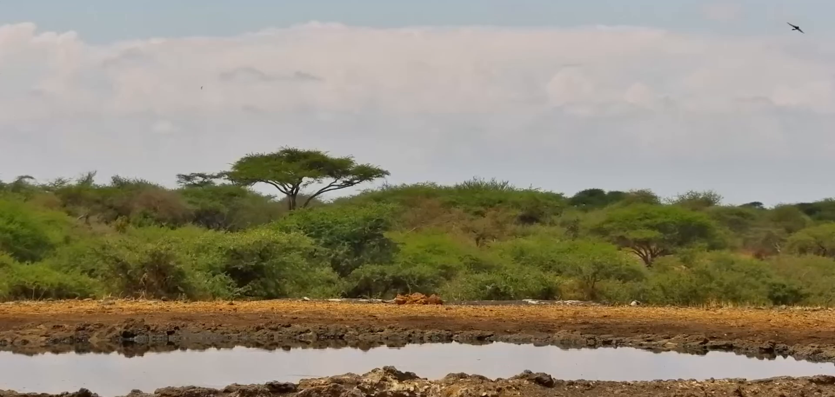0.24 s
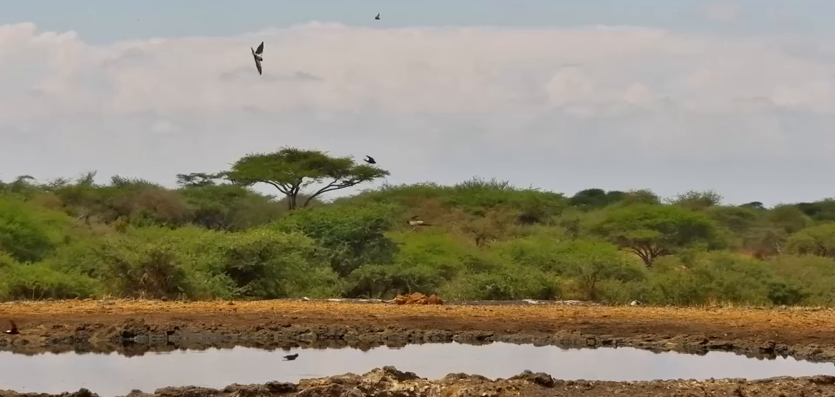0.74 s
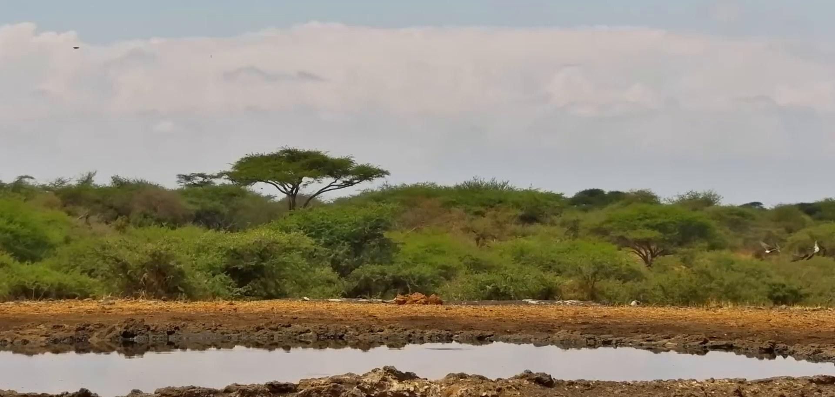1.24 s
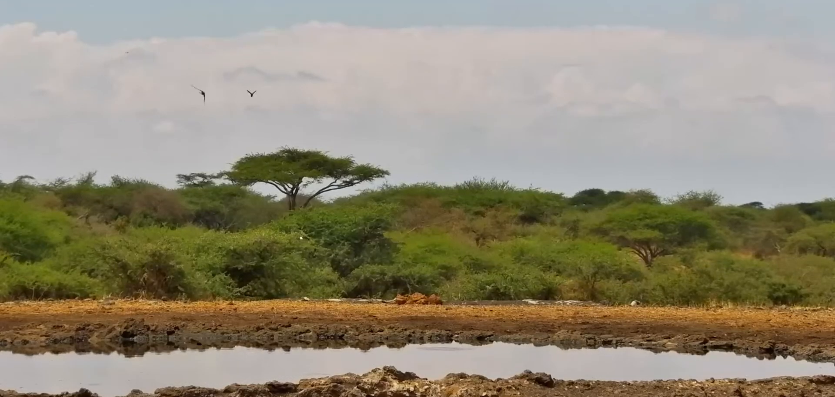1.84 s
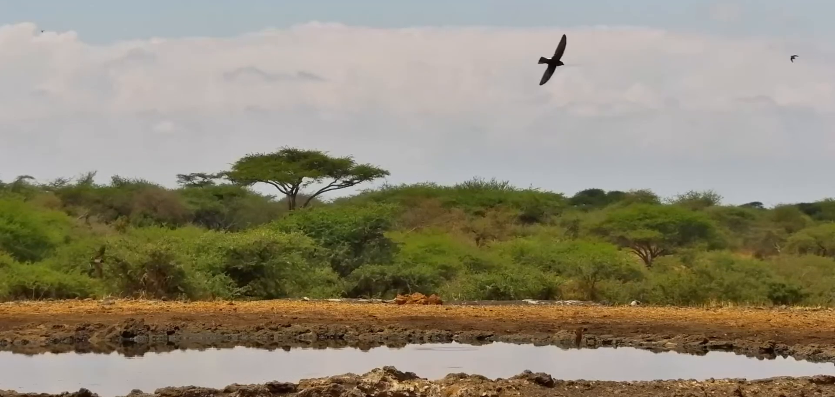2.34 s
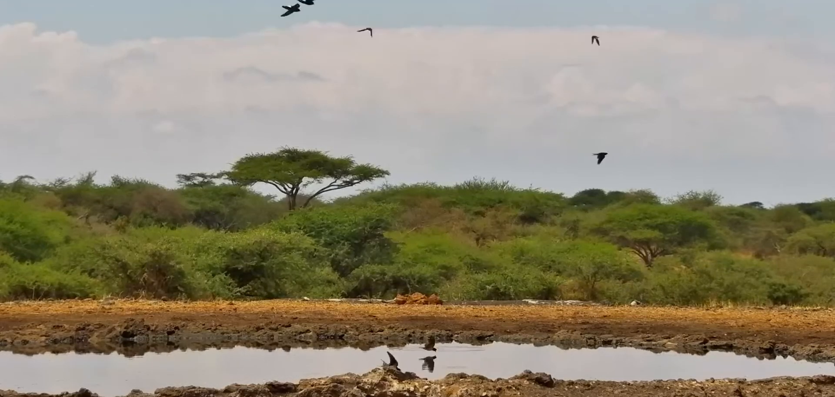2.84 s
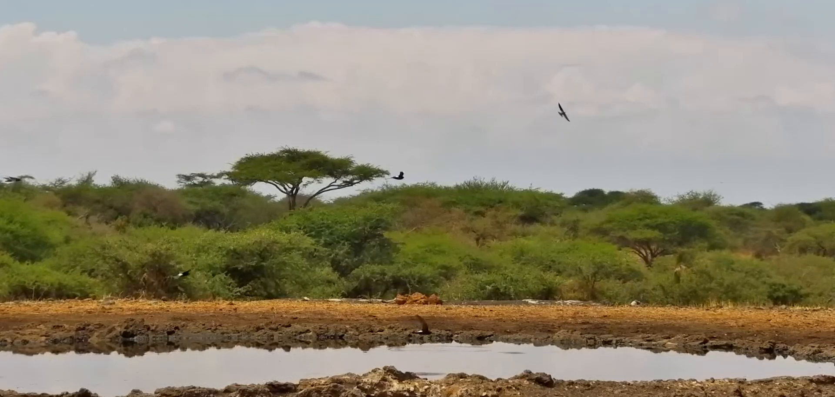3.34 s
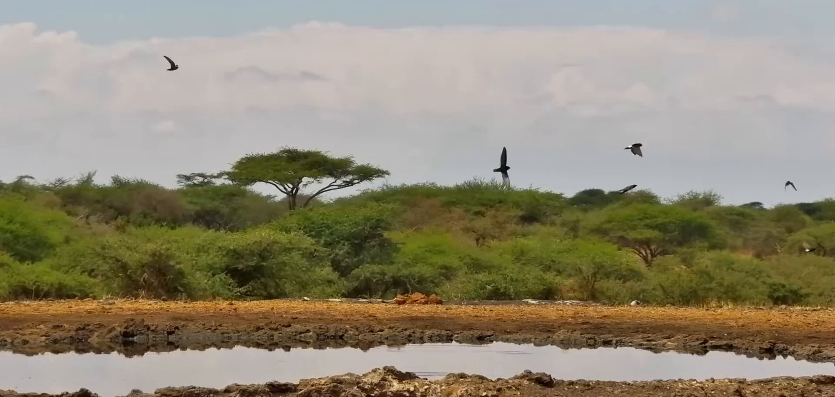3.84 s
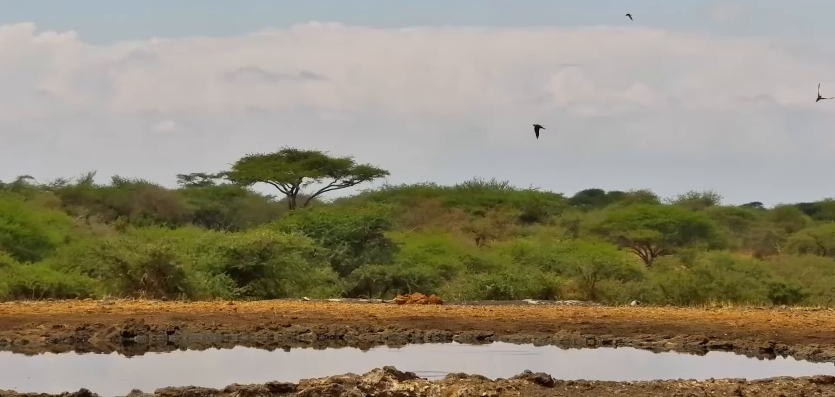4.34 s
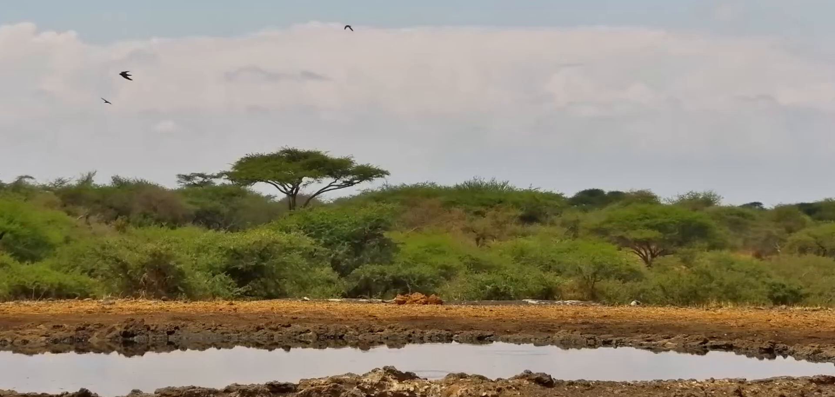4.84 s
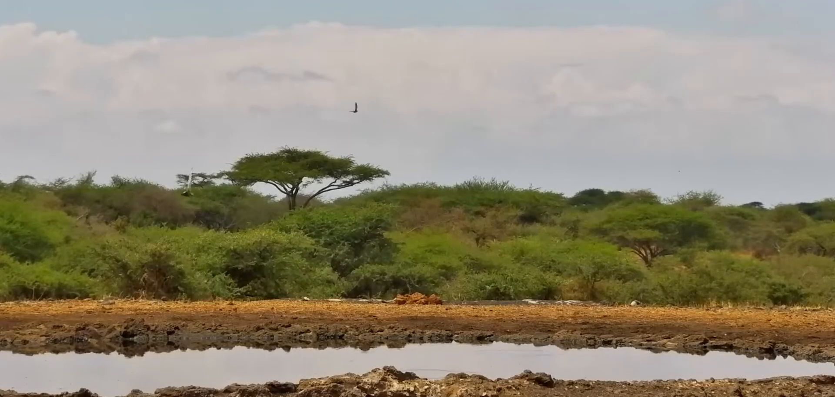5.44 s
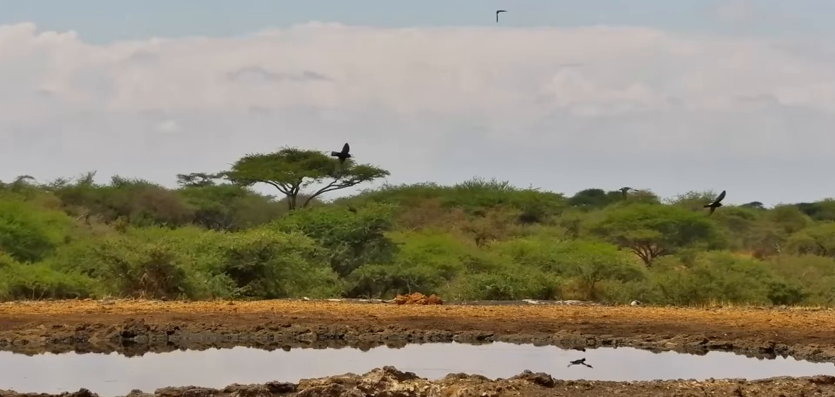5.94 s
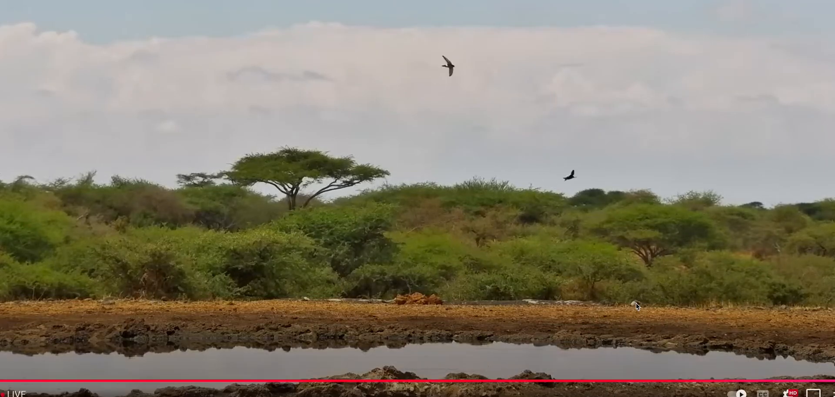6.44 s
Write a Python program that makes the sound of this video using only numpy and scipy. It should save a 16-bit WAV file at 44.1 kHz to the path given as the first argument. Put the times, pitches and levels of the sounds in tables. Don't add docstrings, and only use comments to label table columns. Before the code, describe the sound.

Shrill descending swift trills swell close and fade away outdoors, mixed with brief wing flutters and dull far-off thuds, then only quiet airy hiss.

```python
import sys
import numpy as np
from scipy import signal
from scipy.fft import rfft, irfft
from scipy.io import wavfile
from scipy.ndimage import uniform_filter1d

SR = 44100
rng = np.random.default_rng(int(sys.argv[2]) if len(sys.argv) > 2 else 0)


def wav_record(signal):
    frames = np.transpose(np.atleast_2d(signal))
    bounded = np.clip(frames, -1, 1)
    quanta = np.round(bounded * 32767).astype(np.int16)
    wavfile.write(sys.argv[1], SR, quanta)


def voltage_ratio(level):
    return 10 ** (np.asarray(level, float) / 20)


N = 294984
TIME = np.arange(N) / SR
BINS = np.maximum(np.fft.rfftfreq(N, 1 / SR), 1)

# start_s [s], level_db [dB], pitch_hz [Hz], bend over the
# held part [%], held_ms [ms]
BIRD_1 = [(.606, -47.5, 4620, 3.5, 20), (.633, -41.5, 5220, -1.5, 7.4), (.678, -32, 5030, -4, 16.1),
          (.726, -29.5, 5150, -4.5, 14), (.769, -30.5, 4760, 1, 18), (.797, -43, 4660, -0.5, 7.9),
          (.809, -43, 4830, 3.5, 11), (.857, -40, 4550, -9, 20), (.892, -46, 4550, -9.5, 19),
          (.94, -41, 4700, -1.5, 13.7), (.974, -36, 4080, -3, 6.7), (1.012, -38.5, 4160, 0, 13),
          (1.043, -42, 4370, -3, 12), (1.075, -44, 4060, 4, 14.4), (1.105, -44, 3970, -3.5, 17),
          (1.137, -44.5, 3846, -4.5, 7.4), (1.163, -55, 3780, -11, 5.6), (1.188, -52, 3560, 8, 7.8),
          (1.212, -60, 3540, 10, 6.8)]
BIRD_2 = [(.815, -38, 3680, 0.64, 11), (.855, -36, 3650, 1.4, 7), (.897, -37, 3496, 0, 11.3),
          (.927, -41.5, 3515, 1, 11), (.972, -52, 3430, 2, 5.6), (1.0, -47, 3450, 1.7, 13)]
BIRD_3 = [(1.399, -35, 4240, -1.5, 20.4), (1.454, -22, 4650, -12.5, 12), (1.5, -25.5, 4596, -8, 19.7),
          (1.545, -28.5, 4365, -12.5, 19.6), (1.589, -29.5, 4045, -0.5, 16), (1.632, -25.5, 4010, 1, 14.7),
          (1.672, -23.5, 3980, -1.5, 9.8), (1.711, -27.5, 3860, 2, 15), (1.742, -37, 3930, 1.5, 19),
          (1.779, -33, 3630, 7.5, 11), (1.813, -29, 3500, 9, 9.4), (1.843, -31, 3730, 5.5, 12),
          (1.876, -43.5, 3540, 11, 13.7), (1.905, -43, 3440, 9, 8.8)]
BIRD_4 = [(2.262, -32.5, 4740, -10, 19), (2.272, -22.5, 4200, -13.5, 20), (2.321, -19, 5220, 1.5, 13.3),
          (2.375, -22.5, 3910, 7, 15.2), (2.421, -17, 4820, -3.5, 16.2), (2.465, -17, 4800, -3, 16),
          (2.505, -20.5, 4580, -3.5, 15), (2.543, -24, 4390, -12, 13.3), (2.576, -26, 4150, -1, 10.2),
          (2.605, -30, 4026, 0.5, 14), (2.632, -26.5, 3830, 3, 7.1), (2.659, -26, 3734, -2.5, 8.8),
          (2.686, -21.5, 3766, -6.5, 4.6), (2.706, -32.5, 3616, -3, 7.6)]
BIRD_5 = [(3.017, -31.5, 4550, -2, 16.3), (3.073, -26.5, 4484, -1.5, 11), (3.124, -29.5, 4500, 6.5, 6.7),
          (3.168, -36.5, 3790, 9, 17), (3.216, -35.5, 3790, 6.5, 20), (3.257, -36, 3640, 14.5, 13.7),
          (3.297, -39, 3620, 1.5, 13), (3.335, -61, 3600, -4.5, 9.8), (3.37, -39, 3890, 2.5, 8.7)]
BIRD_6 = [(3.04, -31.5, 5220, 0, 13.8), (3.103, -29, 4760, -3.5, 11), (3.148, -30, 4780, -3.5, 14),
          (3.178, -28, 4900, -2.5, 25), (3.238, -32, 4800, 2, 15), (3.272, -34.5, 4550, 4.5, 8),
          (3.301, -33, 4845, 2.5, 11.2), (3.345, -36, 4710, 1, 25), (3.41, -35, 4420, -1.5, 11.4),
          (3.458, -39.5, 4100, 1, 16), (3.5, -37, 3960, -7.5, 16), (3.547, -39.5, 3580, 11, 14),
          (3.587, -41.5, 3590, 18.5, 17), (3.627, -40, 3650, 9, 12.6), (3.662, -38, 3880, 4, 8.5),
          (3.697, -39, 3920, -4.5, 7.2), (3.727, -38.5, 3860, -2, 10), (3.761, -43.5, 3840, 4, 7.1),
          (3.806, -53.5, 3770, 1, 11)]
BIRD_7 = [(3.379, -54, 4780, 4, 17), (3.42, -45, 5020, -11, 6.4), (3.459, -46, 4670, 3.5, 10),
          (3.499, -44.5, 4570, 4, 23), (3.533, -47, 4620, 3.5, 12), (3.7, -52, 4650, 0, 7.7),
          (3.733, -53, 4660, 3, 14)]
BIRD_8 = [(4.715, -42, 4050, -13, 10.4), (4.771, -41, 4060, -13.5, 13.7), (4.827, -39, 3700, -5, 10.1),
          (4.876, -51.5, 3510, 14, 10), (4.918, -52, 3540, 5, 10.6), (4.961, -50, 3510, 3, 11),
          (5.002, -58, 3440, 4, 7.8)]
BIRD_9 = [(5.163, -53, 4200, 1, 10), (5.209, -32, 4640, 4, 10), (5.247, -38, 4200, 7.6, 9.1),
          (5.283, -37.5, 4060, 6.7, 7.7), (5.326, -47, 3950, 0.5, 7.5), (5.366, -52, 3500, 5.9, 10)]
HIGH_OVERTONES = [(3.257, -48, 6200, 0, 8), (3.296, -50, 6200, 0, 4.4), (3.317, -43, 6070, 1, 4.5),
                  (3.372, -45, 6070, 0, 4.6), (3.424, -45, 5980, 0, 3.3), (3.472, -56, 5970, 0.12, 6),
                  (3.519, -48, 6070, 0.48, 3.2), (3.585, -47, 6230, 1, 5.7), (3.626, -53, 6300, 0.88, 4.9),
                  (3.662, -50, 6080, 1, 8.1), (3.696, -50.5, 5950, 0.091, 4.1)]
BIRD_11 = [(1.27, -54.5, 3930, -5.5, 30), (1.31, -63, 3830, 0, 10)]
# start_s [s], level_db [dB], pitch_hz
# [Hz], bend [%], held_ms [ms]
MORE_HIGH_OVERTONES = [(2.338, -52, 7100, 0, 7.2), (2.388, -44, 7060, -6, 6), (3.022, -57, 8850, -1, 5),
                       (3.029, -47, 6700, 1, 9.1), (3.058, -54, 6950, -8, 6), (3.085, -43, 6900, -11.5, 9),
                       (3.1, -39, 6250, -0.5, 4.3), (3.114, -63, 6700, -3, 8), (3.135, -47, 6620, -2, 11),
                       (3.226, -46, 6250, 4, 7), (3.362, -55, 8870, -6, 7.6), (3.412, -56.5, 8620, 3, 8)]


def coloured(gain):
    noise = irfft(rfft(rng.standard_normal(N)) * gain, N)
    return noise / np.sqrt(np.mean(noise ** 2))


def walk(hz):
    return coloured(np.exp(-(BINS / hz) ** 2))


def swell(s, length):
    return np.exp(-(2 * (TIME - s) / length) ** 2)


def air():
    # pitch_hz [Hz], level_db [dB per Hz]
    spectrum = [(25, -5), (60, -2), (130, 3), (220, -8.5), (500, -9), (1100, -6.5), (1700, -8), (2860, -5),
                (4500, -11), (6000, -14), (7700, -32), (9000, -24), (11400, -18.5)]
    level_db, top_hz = -56, 11670
    pitch_hz, density_db = np.transpose(spectrum)
    colour = voltage_ratio(np.interp(np.log(BINS), np.log(pitch_hz), density_db)) / (1 + (BINS / top_hz) ** 60)
    hiss, gust = rfft(coloured(colour)), walk(0.96)
    out = np.zeros(N)
    for octave in np.arange(4, 15):
        share = np.clip(1 - abs(np.log2(BINS) - octave), 0, 1)
        flicker_db = 0.7 * gust + walk(9)
        out += irfft(hiss * share, N) * voltage_ratio(flicker_db)
    return voltage_ratio(level_db) * out


def hum():
    # pitch_hz [Hz], level_db [dB rms]
    partials = [
        (150.7, -66),
        (250.2, -69.5),
        (349.9, -70.5),
        (549.1, -78.5),
        (748.3, -83),
        (1152, -76),
    ]
    fade_db_per_s, wobble_db = -0.37, 1.5
    out = np.zeros(N)
    for k, (hz, level_db) in enumerate(partials):
        db = level_db + fade_db_per_s * (TIME - TIME[-1] / 2) + wobble_db * walk(1.0)
        out += np.sqrt(2) * voltage_ratio(db) * np.sin(2 * np.pi * hz * TIME + k)
    return out


def notes():
    # start_s [s], level_db [dB], pitch_hz [Hz],
    # length_s [s]
    strays = [(.002, -55, 3190, 0.018), (.003, -54.5, 4540, 0.0077), (0.081, -53, 3950, 0.0047),
              (0.083, -53, 2890, 0.0034), (0.172, -58, 2790, 0.013), (0.148, -59, 3900, 0.0073),
              (0.279, -48.5, 4570, 0.011), (0.282, -59, 5150, 0.0094), (0.275, -53, 4280, 0.0058),
              (0.64, -46, 3960, 0.0053), (0.641, -46, 2875, 0.005), (0.641, -51, 6330, 0.0044),
              (0.969, -52, 6070, 0.0045), (0.013, -55.5, 2900, 0.0088), (1.336, -59.5, 5400, 0.018),
              (1.522, -46, 6080, 0.019), (1.588, -38.5, 5050, 0.0093), (1.606, -39, 5250, 0.0051),
              (1.647, -46, 5100, 0.0033), (1.724, -46, 5260, 0.0036), (1.648, -43, 4840, 0.0064),
              (0.827, -57, 5935, 0.0091), (0.903, -48, 5400, 0.0084), (0.855, -66, 7300, 0.01),
              (0.895, -62, 7000, 0.0089), (2.321, -26, 4730, 0.0047), (2.181, -50, 5230, 0.0031),
              (2.196, -41.5, 5170, 0.0076), (2.203, -28.5, 5960, 0.011), (2.213, -37.5, 4370, 0.017),
              (2.223, -24.5, 3670, 0.005), (2.229, -30, 2990, 0.0031), (2.285, -33.5, 5150, 0.0083),
              (2.336, -23, 3856, 0.0037), (2.71, -38, 4860, 0.0031), (3.01, -32, 5990, 0.0049),
              (3.56, -56, 5540, 0.0066), (3.617, -55, 5000, 0.0055), (4.007, -56, 3140, 0.013),
              (4.224, -51.5, 3010, 0.013), (5.155, -59, 3620, 0.013), (5.189, -53, 3900, 0.0066),
              (5.218, -55, 3870, 0.01), (5.292, -50, 4780, 0.007), (5.503, -55, 3830, 0.0091),
              (5.548, -49.5, 3350, 0.0067), (5.747, -55, 4620, 0.004), (5.75, -54, 3620, 0.0036),
              (5.175, -50, 4500, 0.007),
        (5.228, -53.5, 2800, 0.012),
        (5.153, -56, 2880, 0.008),
        (5.336, -53, 5600, 0.008),
        (0.694, -52, 2750, 0.008),
        (0.738, -53.5, 2800, 0.008),
        (0.82, -51, 6100, 0.006),
        (0.91, -57.5, 5300, 0.006),
    ]
    # trill,
    # first_flick_db [dB], last_flick_db [dB], first_plunge_ms [ms], last_plunge_ms [ms]
    flock = [(BIRD_1, -20.5, -21, 3.8, 4.2), (BIRD_2, -19, -21, 6, 3.9), (BIRD_3, -11.5, -36.5, 7.65, 3.1),
             (BIRD_4, -17.5, -31, 6.12, 2.95), (BIRD_5, -14.5, -20, 7.43, 5.8),
             (BIRD_6, -15, -12.5, 7.2, 5.3), (BIRD_7, -14, -14, 6.5, 6.4), (BIRD_8, -11, -24, 6.7, 5),
             (BIRD_9, -26, -26, 5.3, 5), (HIGH_OVERTONES, -30, -30, 5, 5.6), (BIRD_11, -35, -30, 6, 6),
             (MORE_HIGH_OVERTONES, -35, -32, 5, 5)]
    hoarseness = [-12, -18, -15, -13, -16, -13, -12, -13, -11, -12, -16, -11]
    stray_flick_db, stray_breath_db, stray_plunge_s = -24, -17, 0.006

    rows = []
    for s, db, hz, length in strays:
        rows.append((s, length, db, hz, hz, stray_flick_db, stray_breath_db, stray_plunge_s))
    for (trill, first_db, last_db, first_ms, last_ms), breath_db in zip(flock, hoarseness):
        s, db, hz, bend, held_ms = np.transpose(trill)
        length = np.maximum(held_ms, 2) / 1000
        end_hz = hz * (1 + bend / 100)
        flick_db = np.linspace(first_db, last_db, len(s))
        plunge_s = np.linspace(first_ms, last_ms, len(s)) / 1000
        rows += zip(s, length, db, hz, end_hz, flick_db, breath_db + 0 * s, plunge_s)
    return rows


def housing_db(hz):
    # pitch_hz [Hz], width_hz [Hz], level_db [dB]
    resonances = [(467, 12, 1.5), (570, 109, 7), (727, 146, 6.5), (857, 52, -11), (1399, 56, 6),
                  (1655, 130, -11), (1860, 70, -6), (2130, 70, -5), (1980, 620, -7), (2530, 104, 5.5),
                  (2832, 85, 7.5), (5720, 290, -24), (6090, 300, 7), (6480, 160, -5), (7230, 1630, 4.5),
                  (8716, 720, 9.5), (9170, 120, 9.5), (10170, 510, 6.5), (10730, 120, -21),
                  (11200, 120, 4.5), (13600, 1900, -35)]
    return sum(db * np.exp(-(2 * (hz - mid) / wide) ** 2) for mid, wide, db in resonances)


def swifts():
    overtones = [
        -43,
        -58,
    ]
    # start_s [s], level_db [dB]
    facing = [
        (.7, 0.5),
        (1.5, 5),
        (2.2, 9.5),
        (2.45, 0),
        (2.7, -18),
        (3.0, -7),
        (3.2, 5.5),
        (3.8, -14),
    ]
    head_rise, head_s = 0.012, 0.003
    scoop, drop_in = 1.4, 0.65
    lead_s, landing_s = 0.002, 0.006
    flick_end_hz, flick_rough_db, flick_lag_s, flick_fade_s = 2650, -2, 0.0025, 0.0052
    linger = 0.135
    beak_hz, beak_width_hz, beak_lift_db = 6150, 600, 30
    scoop_overtone, overtone_rough = 0.33, 0.7
    mirror_db, mirror_shift = -11, 0.04
    waver_depth, flutter_db, fade_db = 0.006, 1.2, 45

    out = np.zeros(N)
    flutter, waver, breath, hoarse = walk(240), walk(230), walk(730), walk(450)
    for s, length, db, start_hz, end_hz, flick_db, breath_db, plunge_s in notes():
        shift, turn = rng.uniform(-1.01, 1, size=2)
        at, bend = int(max(s - lead_s, 0) * SR), end_hz / start_hz - 1
        t = np.arange(int((length + plunge_s + landing_s) * SR)) / SR
        here = slice(at, at + len(t))
        held = np.minimum(t / length, 1)
        plunge = np.clip((t - length) / plunge_s, 0, 1)
        closing = np.sin(np.pi / 2 * np.clip((t - length) / 0.003 + 0.5, 0, 1)) ** 2

        hz = start_hz + (end_hz - start_hz) * held
        head = head_rise - (scoop if bend > 0 else drop_in) * bend
        hz = hz * (1 + head * np.exp(-t / head_s))
        fall = plunge + linger * np.sin(2 * np.pi * plunge)
        hz = hz + (min(flick_end_hz, end_hz) - end_hz) * fall
        hz = hz * (1 + waver_depth * waver[here])
        phase = 2 * np.pi * np.cumsum(hz) / SR

        rough = voltage_ratio(breath_db + (flick_rough_db - breath_db) * closing)
        mirror = voltage_ratio(mirror_db) * np.sin(phase * (1 + mirror_shift * shift) + np.pi * turn)
        voice = (np.sin(phase) + mirror) * (1 + rough * breath[here]) / np.sqrt(1 + rough ** 2)

        beak = np.exp(-((2 * hz - beak_hz) / beak_width_hz) ** 2)
        second_db = overtones[0] - 2.6 * closing + np.interp(s, *np.transpose(facing))
        second_db = second_db + beak_lift_db * np.maximum(closing, scoop_overtone) * beak
        second = voltage_ratio(second_db) * (1 + overtone_rough * hoarse[here]) * np.sin(2 * phase)
        third = voltage_ratio(overtones[1] + db + 28) * np.sin(3 * phase)

        emitted_db = db - housing_db(start_hz) + fade_db * min(bend, 0) * held
        emitted_db = emitted_db + flick_db * np.clip((t - length - flick_lag_s) / flick_fade_s + 0.5, 0, 1)
        emitted_db = emitted_db + flutter_db * flutter[here]
        edges = np.minimum(t / 0.0026, 1) * np.clip((t[-1] - t) / 0.006, 0, 1)
        envelope = np.sqrt(2) * voltage_ratio(emitted_db) * np.sin(np.pi / 2 * edges) ** 2
        out[here] += envelope * (voice + second + third)
    return out


def gusts(events, sharp, flutter_hz):
    out, flutter = np.zeros(N), voltage_ratio(2 * walk(flutter_hz))
    for s, db, length, hz in events:
        band = np.exp(-(sharp * np.log(BINS / hz)) ** 2)
        out += voltage_ratio(db) * swell(s, length) * coloured(band)
    return out * flutter


def wing_rushes():
    # start_s [s], peak_db [dB], length_s [s], pitch_hz [Hz]
    rushes = [(0.005, -56, 0.028, 6400), (0.762, -47.5, 0.07, 2050), (0.89, -49.5, 0.13, 2120),
              (1.107, -51.5, 0.19, 2350), (1.34, -45.5, 0.075, 2170), (1.542, -46, 0.066, 2250),
              (1.863, -36, 0.059, 2260), (2.162, -40.5, 0.019, 2260), (2.307, -41, 0.048, 2000),
              (2.585, -43.5, 0.073, 2130), (2.783, -52, 0.14, 1780), (2.91, -44, 0.042, 1760),
              (3.23, -42.5, 0.075, 2040), (3.37, -49, 0.039, 2240), (3.695, -37, 0.073, 2420),
              (4.12, -49, 0.079, 1880), (6.24, -54, 0.93, 2220)]
    events = [(s + 0.024, db - 8.5, length, hz) for s, db, length, hz in rushes]
    return gusts(events, sharp=1.83, flutter_hz=55.6)


def distant_thuds():
    # start_s [s], peak_db [dB], pitch_hz [Hz]
    thuds = [(0.023, -45.5, 375), (0.692, -41, 325), (0.774, -36, 363), (1.432, -38, 350),
             (1.544, -37, 315), (2.082, -38, 328), (2.173, -38, 324), (2.782, -41, 340), (3.286, -42, 344),
             (3.934, -48.5, 322), (4.014, -50.5, 328), (4.529, -51, 315)]
    events = [(s + 0.0058, db - 14.5, 0.04, hz) for s, db, hz in thuds]
    return gusts(events, sharp=1.82, flutter_hz=29.7)


def far_calls():
    # start_s [s], level_db [dB], pitch_hz [Hz], length_s [s]
    calls = [
        (.515, -59, 2900, .022),
        (3.27, -60, 1100, .035),
        (3.73, -58, 1080, .035),
        (1.9, -59, 1150, .035),
        (6.095, -52, 1100, .045),
        (6.12, -62, 984, .05),
        (6.295, -58, 2800, .019),
        (6.52, -54, 1020, .045),
        (6.555, -57, 1370, .04),
        (6.27, -52, 54, .039),
    ]
    out = np.zeros(N)
    for s, db, hz, length in calls:
        since = TIME - s
        out += voltage_ratio(db) * swell(s, length) * np.sin(2 * np.pi * hz * since * (1 - 0.31 * since))
    return (1 + 0.5 * walk(75)) * out


def banks(x):
    # start_s [s], level_db [dB]
    distance = [(.75, 2), (.85, 3), (1.25, 7), (1.4, -0.5), (1.9, -0.5), (2.2, -1.5), (2.7, -2.5),
                (3.0, -0.5), (3.4, 6.5), (3.8, 4), (4.7, -1.5), (5.2, 0.5)]
    t60_s, level_db, gap_s = 0.22, -7.5, 0.00069
    scatter_hz, scatter_share, leaf_damp_hz = 330, 0.36, 5800
    t = np.arange(SR // 2) / SR
    tail = rng.standard_normal(len(t)) * voltage_ratio(-60 * t / t60_s) * (t > gap_s)
    tail = signal.lfilter(*signal.butter(2, leaf_damp_hz, fs=SR), tail)
    tail = tail / np.sqrt(np.sum(tail ** 2))
    smear = np.sqrt(1 - scatter_share) + np.sqrt(scatter_share) * walk(scatter_hz)
    smeared = x * voltage_ratio(np.interp(TIME, *np.transpose(distance))) * smear
    return x + voltage_ratio(level_db) * signal.fftconvolve(smeared, tail)[:N]


def scene():
    echoing = swifts() + wing_rushes() + distant_thuds() + far_calls()
    return (banks(echoing) + air() + hum())[None]


def housing(x):
    size = 4096
    cepstrum = irfft(np.log(voltage_ratio(housing_db(np.fft.rfftfreq(size, 1 / SR)))), size)
    cepstrum[1:size // 2] *= 2
    cepstrum[size // 2 + 1:] = 0
    response = irfft(np.exp(rfft(cepstrum)), size)
    return signal.fftconvolve(x, response[None])[:, :N]


def preamp_hiss(heard):
    level_db, hiss_hz, width_hz = -78, 5700, 350
    mute_from_db, mute_range_db, mute_s = -50, 5, 0.04
    power = abs(uniform_filter1d(heard ** 2, int(mute_s * SR)))
    mute = np.clip((10 * np.log10(power + 1e-12) - mute_from_db) / mute_range_db, 0, 1)
    return (1 - mute) * voltage_ratio(level_db) * coloured(np.exp(-((BINS - hiss_hz) / width_hz) ** 2))


def gain_control(x):
    duck_db, duck_from_db, release_s = 0.33, -31, 0.56
    keep = np.exp(-1 / (release_s * SR))
    power_db = 10 * np.log10(signal.lfilter([1 - keep], [1, -keep], x ** 2) + 1e-12)
    return x * voltage_ratio(-duck_db * np.maximum(power_db - duck_from_db, 0))


def roll_off(x):
    return signal.sosfilt(signal.butter(12, 15720, fs=SR, output="sos"), x)


def record(dry):
    heard = housing(dry)
    heard = heard + preamp_hiss(heard)
    return roll_off(gain_control(heard))


dry = scene()
out = record(dry)
wav_record(out)
```